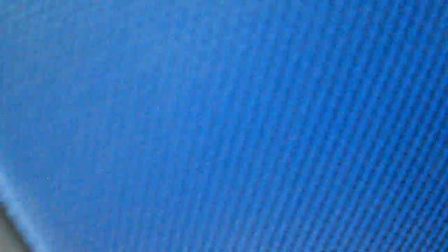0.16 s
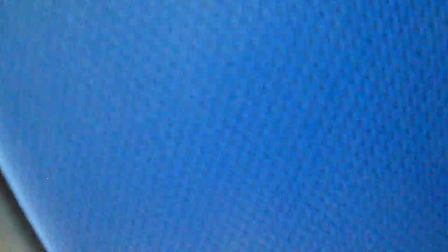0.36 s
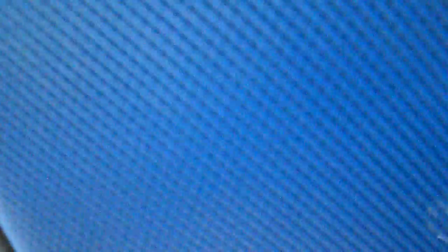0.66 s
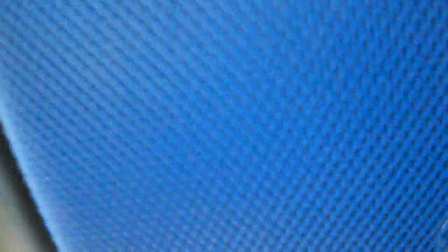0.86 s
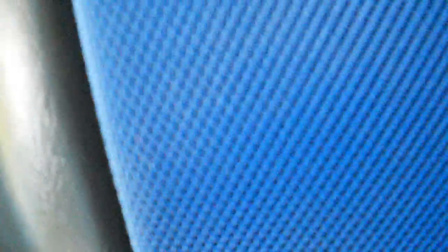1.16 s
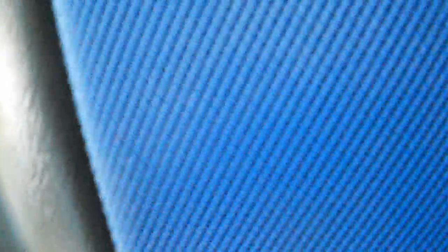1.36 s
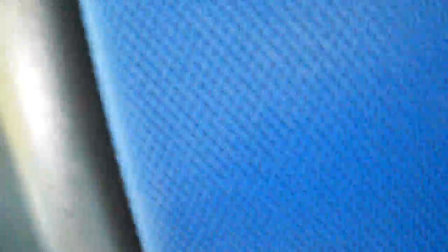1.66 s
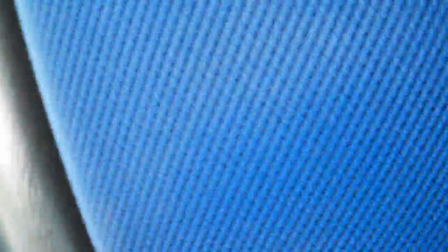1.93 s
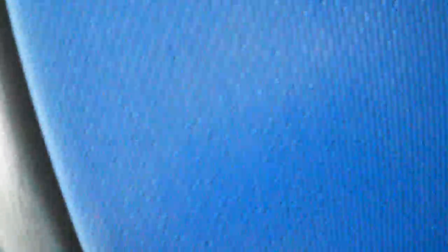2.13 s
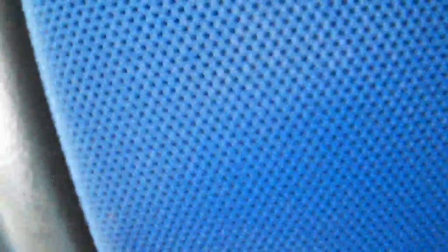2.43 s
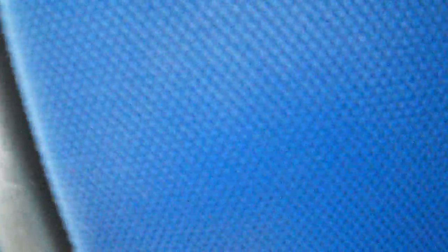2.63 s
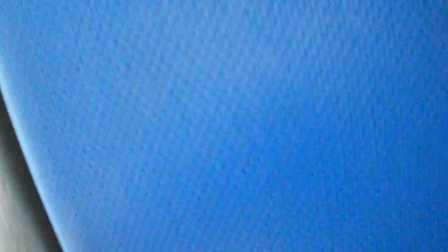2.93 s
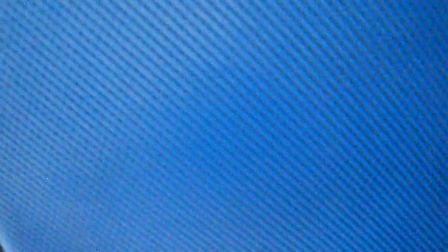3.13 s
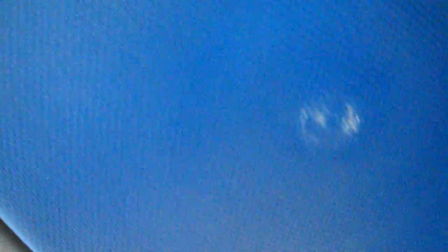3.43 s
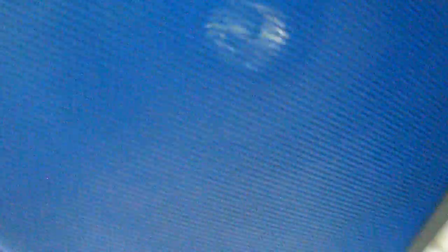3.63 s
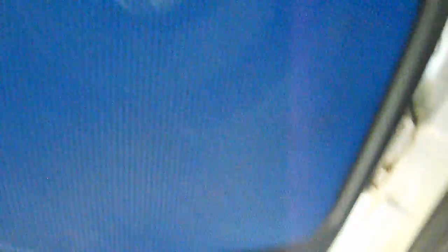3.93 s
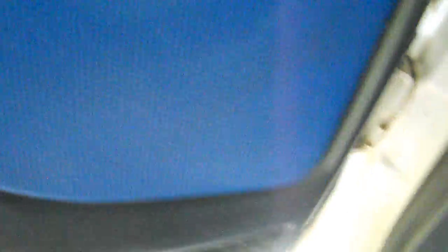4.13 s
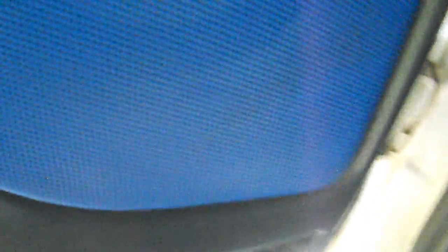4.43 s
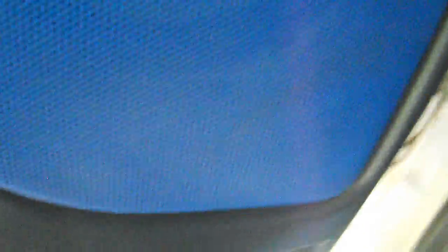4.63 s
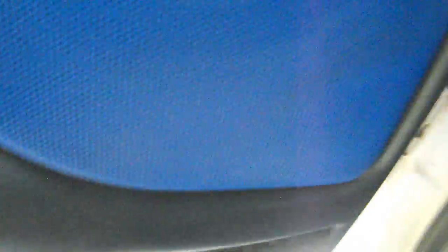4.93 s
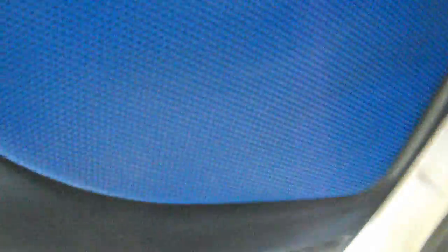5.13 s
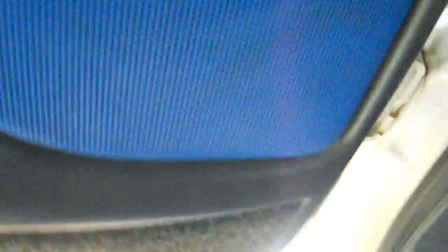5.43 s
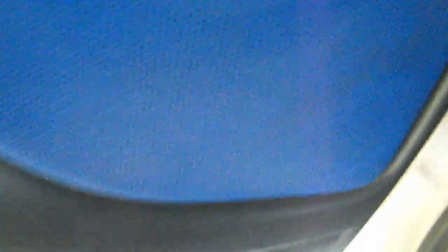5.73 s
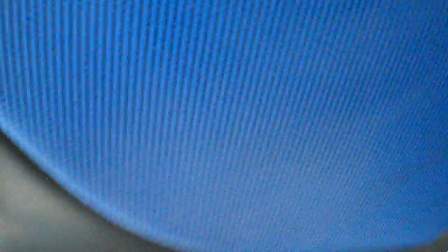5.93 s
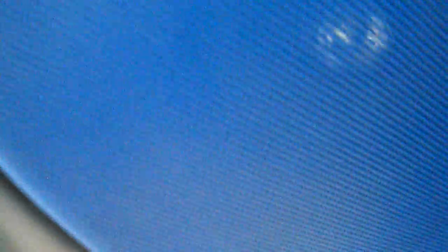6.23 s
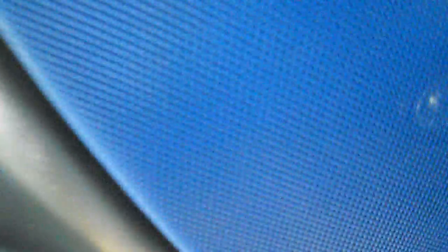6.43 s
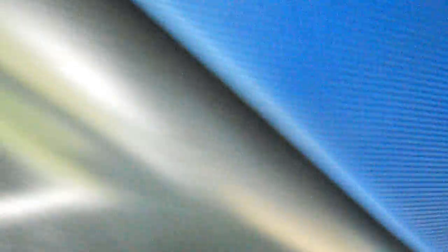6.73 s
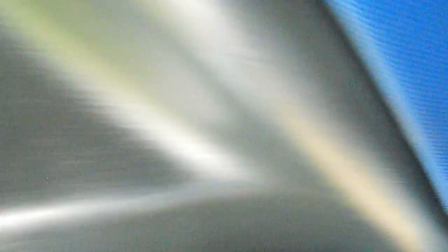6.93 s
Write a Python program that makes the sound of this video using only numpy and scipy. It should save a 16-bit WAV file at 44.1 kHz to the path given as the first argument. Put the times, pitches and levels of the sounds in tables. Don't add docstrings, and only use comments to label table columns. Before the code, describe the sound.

A stiff brush scrubs carpet in short raspy strokes, knocking hard plastic trim and thumping the floor, over a low motor hum and hiss.

```python
import sys
import numpy as np
from scipy import signal
from scipy.io import wavfile
from scipy.ndimage import uniform_filter1d

SR = 44100
rng = np.random.default_rng(int(sys.argv[2]) if len(sys.argv) > 2 else 0)


def volts_from_db(level):
    exponent = np.asarray(level, float) / 20
    return 10 ** exponent


def bounce(signal):
    frames = np.transpose(np.atleast_2d(signal))
    limited = np.clip(frames, -1, 1)
    pcm = np.round(limited * 32767).astype(np.int16)
    wavfile.write(sys.argv[1], SR, pcm)


N = 312228
T = np.arange(N) / SR

# (time [s], gain [dB])
RECORDER_GAIN = [(0.17, -3), (0.72, 1.5), (1.21, -0.6), (2.85, 3), (3.21, -0.2), (4.33, 2), (4.8, -3),
                 (4.95, 0.8), (5.1, -2), (5.25, -17), (5.4, -17), (5.5, -15), (5.78, -17.5), (5.86, -11),
                 (6.24, -6), (6.55, -1.5), (6.92, -1.5), (7.05, -5.5)]


def evened(x):
    return x / np.sqrt(np.mean(x ** 2) + 1e-20)


def add(mix, s, sound):
    part = mix[round(s * SR):][:len(sound)]
    part += sound[:len(part)]


def curve(rows, axis):
    rows = np.array(rows)
    return np.interp(T, rows[:, 0], rows[:, axis])


def colour(x, points, patchy_db, size=512):
    hz, _, z = signal.stft(x, SR, nperseg=size, noverlap=size * 3 // 4)
    f, db = np.transpose(points)
    shape_db = np.interp(np.log(hz + 1), np.log(f + 1), db, left=-70, right=-70)
    patches = uniform_filter1d(rng.standard_normal(z.shape), size=5, axis=0)
    patches = uniform_filter1d(patches, size=12, axis=1)
    z = z * volts_from_db(shape_db[:, None] + patchy_db * evened(patches))
    return evened(signal.istft(z, SR, nperseg=size, noverlap=size * 3 // 4)[1][:N])


def resonate(x, hz, width):
    turn = np.exp(2j * np.pi * np.cumsum(hz) / SR)
    r = np.exp(-np.pi * width / SR)
    return 2 * (turn * signal.lfilter([1 - r], [1, -r], x / turn)).real


def motor():
    # (time [s], shaft speed [Hz], load [dB])
    shaft = [(0, 63.82, -43.5), (1.2, 63.9, -46.5), (1.5, 63.8, -38), (2, 64.03, -41.5), (2.3, 63.7, -46),
             (2.8, 64.1, -44.5), (3.6, 63.76, -38.5), (4.5, 64.14, -38.5), (5.08, 64, -45.5),
             (6.3, 64.6, -47), (7.08, 63.45, -51)]
    # (multiple of the shaft speed, level [dB], drift [dB per s])
    orders = [(1, -5.5, 2), (2, 0, 0), (3, -7, 1.9), (4, -10, 1.5), (5, -22, -2.5), (6, -13.5, 0),
              (7, -43, 1), (8, -18, 0.5)]
    turns = np.cumsum(curve(shaft, axis=1)) / SR
    lines = np.zeros(N)
    for k, db, drift_db in orders:
        waver = evened(uniform_filter1d(rng.standard_normal(N), size=8000))
        level_db = db + drift_db * (T - 3.5) + 1.2 * waver
        lines += volts_from_db(level_db) * np.sin(2 * np.pi * k * turns + 0.379 * k ** 2)
    load_db = curve(shaft, axis=2) + curve(RECORDER_GAIN, axis=1)
    peak_s, rise_db_per_s, fall_db_per_s = 1.8, 60, 28.5
    away_db = np.maximum(rise_db_per_s * (peak_s - T), fall_db_per_s * (T - peak_s))
    hum = volts_from_db(-33 - away_db) * np.sin(2 * np.pi * 84.8 * T)
    return np.sqrt(2) * (volts_from_db(load_db) * lines + hum)


def background():
    # (frequency [Hz], density [dB per Hz])
    air_tone = [(120, -28.5), (200, -13.5), (225, -2.5), (280, -9.5), (385, -11), (597, -15), (742, -14.5),
                (1070, -17.5), (1500, -18), (3730, -22.5), (8500, -25.5), (10600, -28.5), (11200, -64),
                (14500, -76), (22000, -120)]
    # (frequency [Hz], density [dB per Hz])
    rumble_tone = [(4.7, -32), (8.0, 14), (16, -5), (27, -4.5), (86, 1.5), (133, -7), (156, -7.5),
                   (197, -11), (231, -26), (260, -22), (340, -49), (570, -120)]
    hiss = colour(rng.standard_normal(N), air_tone, patchy_db=2.0, size=1024)
    rumble = colour(rng.standard_normal(N), rumble_tone, patchy_db=0.5, size=4096)
    gain_db = curve(RECORDER_GAIN, axis=1)
    return volts_from_db(-40 + gain_db) * hiss + volts_from_db(-37.5 + 1.1 * gain_db) * rumble


def flicks(spread_db):
    size = volts_from_db(spread_db * np.minimum(rng.exponential(1, N), 4)) * rng.standard_normal(N)
    flicks_per_s = 20000
    return evened(size * (rng.random(N) < flicks_per_s / SR))


def grit():
    size = volts_from_db(1.2 * np.minimum(rng.exponential(1, N), 2)) * np.tanh(rng.standard_normal(N))
    jolts_per_s = 1500
    return evened(size * (rng.random(N) < jolts_per_s / SR))


def strokes():
    # (share of the stroke, level lost [dB],
    # tip fizz [dB], block drag [dB], resonance ratio)
    sweeps = [
        (0.0, .123, -28, -3, 590),
        (1.268, 0.23, -32.5, -3, 550),
        (1.751, 0.114, -28, 1.5, 470),
        (2.13, 0.15, -25.5, 0, 416),
        (2.542, 0.098, -25.5, 0.5, 650),
        (3.504, 0.099, -26.5, 0.5, 844),
    ]
    sweep = [(0, 7, -6.5, 6, 0.68), (.28, 1.5, -10, -1, 1.11), (.88, 1.5, -4, 0, 0.85),
             (1, 2, -1.5, 1, 0.58)]
    swells = [
        (0.955, 0.18, -31, 2.7, 520),
        (2.99, 0.11, -23, 3.95, 710.5),
        (4.0, 0.201, -25, 3.8, 1016),
        (4.478, 0.15, -24.5, 3.3, 1070),
        (4.958, 0.15, -29, 4.3, 1078),
    ]
    swell = [(0, 15, -4, 4, 1.4), (0.199, 2.5, -6.5, 3.5, .99), (0.749, 1, -3.5, 0, 1.15),
             (1, 13.5, 0.5, 2, 0.55)]
    flick_strokes = [
        (1.842, 0.06, -26.5, -3, 465),
        (2.647, 0.042, -16.5, 10.5, 444),
        (5.16, 0.082, -46, -6.5, 602),
        (6.128, 0.046, -22, 2, 478),
    ]
    flick = [(0, 5, -4, 2, 1.1), (.2, -1.5, -0.5, 0.5, 0.89), (.6, 2, 0, -7, .99), (1, 17.5, -3, 4, 0.94)]
    scuffs = [
        (0.495, 0.165, -37.5, -10.5, 447),
        (5.11, 0.058, -42.5, -4, 834),
        (6.445, 0.021, -39, 7, 343),
    ]
    scuff = [(0, 2.5, -5.5, 13, .95), (0.201, 0.5, -8, 4.6, 0.55), (.75, 0.5, -8.5, 2.2, 1.93),
             (1, 1.8, -1, 12, 1.1)]
    rubs = [
        (0.417, 0.077, -30.5, -3, 330),
        (3.95, 0.033, -44.5, 0.5, 435),
    ]
    rub = [(0, -1.5, -19, 13, .98), (.2, 0, -29, 11, 0.79), (.75, 2.5, -22, 15, 0.94),
           (1, 6, -14, 11, 0.94)]
    grazes = [
        (0.195, 0.099, -38.5, 3.5, 498),
        (0.853, 0.061, -32, 0.5, 534),
        (3.26, 0.096, -37.5, 5.5, 640),
        (3.68, 0.086, -36, 5, 600),
        (4.22, 0.089, -46, -5, 430),
        (4.39, 0.073, -35, 9, 477.4),
        (6.3, 0.029, -40, 8, 622),
    ]
    graze = [(0, 8.1, -1, 8.5, 0.68), (.3, 2, -9, -7, 1.5), (.8, 4.7, -4.5, 3.5, 1), (1, 7.6, -4, 5, 0.93)]
    wisps = [
        (2.34, .04, -49.5, 0.0023, 477),
        (2.405, 0.081, -49, 0, 530),
    ]
    wisp = [(0, 1, 7, -11, 1.1), (.3, 1, 7.4, -6, .99), (.7, 4, 8, -12, 1.01), (1, 5, 6, -1, 1.01)]
    lunges = [
        (3.112, .037, -17, 1.9, 447),
        (4.656, .029, -13.5, 1, 780),
    ]
    lunge = [(0, 6.5, -0.91, -9, 0.88), (.15, -1.5, -1.3, -2.5, 0.89), (.8, 4, 0, -3.5, .99),
             (1, 4, 0, -4.5, 0.64)]
    digs = [
        (4.638, .018, -19, 3.5, 823),
        (6.559, 0.081, -35, -4.5, 524),
        (6.634, 0.076, -31, -0.5, 658),
    ]
    dig = [(0, -1, -15, 4, 1.02), (.2, 1.5, -5, 6.7, 1.01), (.8, 2, -3, 4, .99), (1, 16, -11.5, 3.7, 0.78)]
    trails = [
        (3.149, 0.016, -40, 0.5, 440),
        (4.685, 0.03, -31, -1.5, 784),
    ]
    trail = [(0, 3, 0, -1, 0.69), (.2, -4.5, 0, -8, 0.69), (.8, 4, 0, -1.5, .99), (1, 8.5, 0, -6.5, 0.95)]
    slides = [
        (6.782, 0.061, -43, 0, 553),
    ]
    slide = [(0, 8.6, -32, 13, 0.93), (.4, 1, -38, 12, 1), (.7, 2, -40, 12, 1.1), (1, 12, -32, 15, 1.4)]
    glides = [
        (5.478, .12, -45, 3, 1096),
    ]
    glide = [(0, 9.5, -1, 4.5, 1.05), (.4, -1.5, 0, 2, 1.2), (.8, -1, -1, -1.5, .85), (1, 3, -6, 1, 0.67)]
    drops = [
        (5.6, 0.08, -34.5, -2, 1000),
    ]
    drop_kind = [(0, 3, -0.5, -4.5, 0.74), (.2, 1.5, -1, -5, 1.06), (.65, 3, 2, -4, .68),
                 (1, 14.5, 1, 3, 0.44)]
    pulls = [
        (0.806, .03, -40, -2.5, 700),
        (6.007, .12, -28.5, 5, 431),
    ]
    pull = [(0, 2.5, -14, 4, .95), (.2, .5, -7, 4.2, 1.6), (.75, .5, -5.5, 2.5, 1.2), (1, 2, -3, 1, 1.1)]
    kinds = ((sweeps, sweep), (swells, swell), (flick_strokes, flick), (scuffs, scuff), (rubs, rub),
             (grazes, graze), (wisps, wisp), (lunges, lunge), (digs, dig), (trails, trail),
             (slides, slide), (glides, glide), (drops, drop_kind), (pulls, pull))
    starts = np.sort([row[0] for events, _ in kinds for row in events] + [N / SR + 1])
    run_on_s = 0.015
    out = []
    for events, kind in kinds:
        share, lost_db, fizz_db, drag_db, ratio = np.transpose(kind)
        for s, length, db, build_db, hz in events:
            room = starts[starts > s][0] - s - 2 / SR
            lifts = np.append(np.ones(len(share) - 1), room > length + run_on_s)
            to_build = np.clip(1 - (share - share[1]) / (share[2] - share[1]), 0, 1)
            level_db = db - lifts * lost_db - build_db * to_build
            press_db = 2.5 * np.log2(hz / 500)
            times = s + (length if lifts[-1] else room) * np.clip(share, 0, 1)
            out.append(np.transpose([times, level_db, fizz_db, drag_db + press_db, hz * ratio]))
    return out


def brush():
    # (frequency [Hz], density [dB per Hz])
    bristle_tone = [(880, -46), (1500, 12), (1590, -22), (1880, -3.5), (2520, 4), (2860, -5.5), (3870, -2),
                    (5230, -4), (5790, -3.5), (7380, -5.5), (9730, -10), (10700, -18), (11100, -78.5),
                    (14500, -66), (22000, -120)]
    # (frequency [Hz], density [dB per Hz])
    drag_tone = [(71, 11.5), (120, -11), (216, 4), (443, 5.5), (598, -4.5), (771, 0), (950, -3.5),
                 (1390, -2), (1900, -6.5), (2470, -45.5), (4180, -120)]
    played = strokes()
    rows = np.concatenate(played)
    rows = rows[np.argsort(rows[:, 0])]
    level_db, fizz_db, drag_db, well_hz = [curve(rows, axis) for axis in (1, 2, 3, 4)]

    contact = np.zeros(N)
    for stroke in played:
        contact[max(round(stroke[0][0] * SR), 0):round(stroke[-1][0] * SR)] = 1
    contact = uniform_filter1d(contact, size=480) ** 0.85
    clicks = flicks(spread_db=-0.6)
    grip = evened(uniform_filter1d(rng.standard_normal(N), size=400))
    level = contact * volts_from_db(uniform_filter1d(level_db, size=240) + 0.18 * grip)

    low_tone = [p for p in bristle_tone if p[0] < 3900]
    high_tone = [p for p in bristle_tone if 2800 < p[0] < 5400]
    fizz_tone = [p for p in bristle_tone if p[0] > 5000]
    low = colour(clicks, low_tone, patchy_db=2.5, size=256)
    high = colour(flicks(spread_db=-1.5), high_tone, patchy_db=2.5, size=256)
    tips = volts_from_db(0.5 * fizz_db + 3.5)
    rasp = (low + tips * high) / np.sqrt(1 + tips ** 2)
    fizz = colour(clicks, fizz_tone, patchy_db=2.0, size=256)

    weight = np.clip(drag_db / 14, 0, 1)
    jolts = (1 - weight) * flicks(spread_db=-1.5) + weight * grit()
    deep = colour(jolts, [p for p in drag_tone if p[0] < 700], patchy_db=-1.5)
    drag = evened(colour(jolts, drag_tone, patchy_db=3.5) + 0.8 * weight * deep)

    wander = 1 + 0.073 * evened(uniform_filter1d(grip, size=900))
    well = evened(resonate(clicks, wander * well_hz, width=134))
    gap = evened(resonate(clicks, 1.34 / wander * well_hz, width=246))
    well_db = -5.5 + 5 * np.log2(well_hz / 500)
    block = evened(drag + volts_from_db(well_db) * well + volts_from_db(-6) * gap)
    return level * (rasp + volts_from_db(fizz_db) * fizz + volts_from_db(drag_db) * block)


def tufts():
    # (start [s], length [s], level [dB], centre [Hz])
    springs = [(1.76, 0.083, -32, 2300), (2.135, 0.15, -35, 2300), (2.187, 0.07, -36, 3800),
               (2.55, .08, -36, 4000), (2.56, 0.079, -36, 1500), (6.129, .035, -31, 2800),
               (6.128, 0.042, -32, 4300), (6.795, .04, -39, 2200), (0.414, 0.016, -24.5, 2700),
               (0.441, .012, -25, 2750), (0.095, 0.034, -35, 5500), (0.858, .02, -39, 2100),
               (5.604, .05, -44, 2400), (6.574, .04, -38, 2350)]
    out, clicks = np.zeros(N), flicks(spread_db=-1.5)
    for s, length, db, hz in springs:
        part = clicks[round(s * SR):round((s + length) * SR)]
        centre_hz = np.full(len(part), hz)
        ring = resonate(resonate(part, centre_hz, width=420), centre_hz, width=420)
        add(out, s, volts_from_db(db) * np.sqrt(np.hanning(len(part))) * evened(ring))
    return out


def ticks():
    # (time [s], peak [dB], centre [Hz])
    plastic = [(.239, -25, 3300), (.406, -25, 2150), (1.765, -15, 2300), (1.785, -23, 2250),
               (0.4155, -20, 3500), (0.424, -10.5, 2680), (0.4425, -19, 4500), (.458, -22, 5200),
               (.467, -23, 2100), (0.479, -14.5, 2600), (0.495, -6, 5900), (0.5, -9.5, 4260),
               (.522, -20.5, 5000), (.672, -33, 5500), (.805, -34, 3770), (1.1617, -25.5, 2500),
               (3.3398, -17.5, 2080), (3.7556, -26, 2300), (3.9457, -29, 2182), (4.39, -28, 2970),
               (4.79, -44, 2370), (4.8841, -24, 2900), (5.0966, -5, 6400), (5.1021, -7.5, 2160),
               (6.0041, -26, 2000), (6.456, -23, 4730), (6.557, -30, 2320), (6.564, -26, 2300),
               (6.571, -9, 3620), (6.578, -21, 2420), (6.59, -33, 2300), (6.6, -28, 1900),
               (6.634, -29, 2250), (6.635, -16.5, 3700), (6.658, -25, 3020), (6.668, -29, 3620),
               (6.712, -24, 3900), (6.74, -26.5, 4300), (6.781, -38, 2370), (6.794, -40, 2300),
               (6.8015, -36.5, 2270), (6.811, -38, 2180), (6.8186, -40.5, 2240), (6.828, -59, 2320)]
    out, t = np.zeros(N), T[:3000]
    wide = signal.butter(2, [1800, 8500], "band", fs=SR)
    fade_db = -60 * t / 0.022
    for s, db, hz in plastic:
        noise = rng.standard_normal(len(t))
        centre_hz = np.full(len(t), hz)
        narrow = resonate(resonate(noise, centre_hz, width=550), centre_hz, width=550)
        centre = evened(signal.lfilter(*wide, narrow))
        snap = volts_from_db(-4.5 + fade_db) * evened(signal.lfilter(*wide, noise))
        add(out, s, 0.5 * volts_from_db(db + fade_db) * (centre + snap) * np.minimum(t / 0.00025, 1))
    return out


def knocks():
    # (time [s], peak [dB], ring [Hz], hardness [dB per octave])
    blows = [(0.418, -14, 450, 1), (0.437, -4.5, 436, 7), (0.454, -5, 428, 4.5), (0.711, -34, 510, 12),
             (2.128, -12, 500, -1.5), (2.543, -34, 600, 10), (2.656, -15, 407, 11.5), (2.673, -9, 402, 5),
             (3.123, -7, 454, 4.5), (3.137, -8.5, 442, 3), (3.339, -9.5, 694, 7.5), (3.414, -25.5, 430, -8),
             (3.758, -15, 1074, 1), (3.923, -22, 1460, 1), (3.943, -29.5, 408, 18), (4.389, -16.5, 640, 3),
             (4.499, -8.5, 1074, 0.5), (4.789, -29.5, 620, 11.5), (4.884, -20.5, 900, -3.5),
             (5.0956, 12.5, 1080, 1.5), (5.41, -35.5, 1120, -2), (6.0055, -15, 814, 5.5),
             (6.09, -14, 445, 9.5), (6.458, -19.5, 587, -4), (6.531, -30, 413, 3), (6.563, -12, 500, 5),
             (6.57, -5, 605, 7.5), (6.583, -15, 695, 8), (6.601, -11.5, 800, -6), (6.619, -19.5, 700, -4),
             (6.635, -9, 622, -6), (6.669, -14, 759, -10), (6.71, -14.5, 640, -3), (6.739, -15, 624, -6),
             (6.782, -20.5, 478, -6)]
    # (ratio to the ring, level [dB])
    modes = [(0.329, -3), (.5, -9), (.65, -1.5), (1.001, 4), (1.22, -6), (1.5, -7), (1.849, -5),
             (2.15, -10.5), (2.5, -12.5), (3.001, -17.5), (3.7, -18.5)]
    out, t = np.zeros(N), T[:6000]
    for s, db, hz, hard_db in blows:
        t60 = 0.049 * (500 / hz) ** 0.78
        ring = np.zeros(len(t))
        for k, mode_db in modes:
            chance = rng.random()
            mode_hz = hz * k * (0.987 + 0.088 * chance)
            fade = volts_from_db(mode_db + hard_db * np.log2(k) - 60 * t * k ** 0.32 / t60)
            ring += fade * np.cos(2 * np.pi * (mode_hz * t - 0.74 * chance))
        body = signal.butter(2, [0.13 * hz, 5.5 * hz], "band", fs=SR)
        crack = evened(signal.lfilter(*body, rng.standard_normal(len(t))))
        ring += volts_from_db(2 - 60 * t / (0.37 * t60)) * crack
        add(out, s + 0.000975, 0.27 * volts_from_db(db) * ring * np.minimum(t / 0.00081, 1))
    return out


def cabin(x):
    at = np.arange(60, 5000, 22)
    at = at + rng.integers(0, 22, len(at))
    taps = np.zeros(5100)
    taps[at] = rng.choice([-1., 1.], len(at)) * volts_from_db(-60 * at / SR / 0.081)
    soft = signal.lfilter(*signal.butter(1, 2000, fs=SR), taps / np.linalg.norm(taps))
    return signal.oaconvolve(x, soft)[:N]


def thumps():
    # (time [s], peak [dB], pan [Hz], t60 [s])
    pan_thumps = [(0.419, -6, 217, 0.14), (0.438, -1.5, 223, 0.18), (0.468, -7, 261, 0.16),
                  (0.513, -11.5, 280, 0.22), (0.802, 11, 95.2, 0.082), (0.839, 0.5, 112, 0.073),
                  (0.894, -14, 62.3, 0.11), (1.283, -12, 86.5, 0.13), (2.132, -7, 80.4, 0.088),
                  (3.944, -11, 150, 0.12), (4.049, -9, 72.6, 0.11), (4.501, -0.5, 113, 0.068),
                  (4.899, -7, 89, 0.1), (5.053, -17, 77.1, 0.14), (5.108, 2.5, 294, 0.032),
                  (5.404, -21, 107, 0.075), (5.485, -32, 77, 0.34), (6.018, 1, 98, 0.11),
                  (6.455, -2, 245, 0.045), (6.477, -15, 254, 0.19), (6.548, -0.5, 196, 0.035),
                  (3.965, -11, 113, 0.13), (4.007, -14, 105, 0.18), (6.56, 2.5, 96, 0.15),
                  (6.568, 4, 302, 0.049), (3.115, -10.5, 374, 0.15),
                  (0.424, -17.5, 90, 0.22),
        (0.489, -11, 75, 0.13),
        (4.64, -6, 119.3, 0.14),
        (6.133, -7.5, 88.4, 0.065),
        (6.029, -14, 204.4, 0.13),
        (6.449, -37, 63.8, 0.1),
    ]
    # (time [s], peak [dB], ring [Hz], t60 [s])
    bumps = [(2.655, -5.5, 424, 0.11), (2.671, -3, 430, 0.11), (2.679, -9, 450, 0.091),
             (3.113, -11, 430, .1), (3.127, -8, 445, .1), (3.139, -5.5, 452, .1), (4.642, -13, 720, .1),
             (4.649, -11, 1200, .1), (4.658, -7, 700, 0.13), (4.664, -7, 850, .1), (4.669, -5, 730, 0.12),
             (4.676, -11.5, 890, .12), (6.093, -10, 1195, .08), (6.156, -12.5, 410, 0.1),
             (6.713, -19, 770, 0.16), (5.099, -5.5, 580, 0.11), (3.056, -10, 750, 0.14),
             (3.072, -11, 810, .12), (3.982, -28, 1290, 0.13), (6.741, -22, 625, 0.12),
             (6.638, -13, 780, 0.15), (5.572, -28, 440, 0.11), (5.658, -29.5, 400, .15),
             (6.762, -21.5, 260, .15), (6.012, -14, 400, 0.084), (6.104, -17, 420, .12),
             (5.066, -16, 180, .1), (5.076, -22, 440, 0.074), (5.608, -22, 1150, .2),
             (5.524, -28, 1200, .2), (.53, -14, 230, 0.26), (5.099, -4.5, 680, .13),
             (3.341, -17.5, 350, 0.096), (4.39, -21, 520, 0.1), (6.462, -14, 300, .08)]
    out, t = np.zeros(N), T[:9000]
    for s, db, hz, t60 in pan_thumps + bumps:
        swell = 1 - np.exp(-(t * hz / 0.78) ** 2)
        fade = volts_from_db(db - 60 * t * (hz / 100) ** 0.5 / t60)
        add(out, s, 0.59 * fade * swell * np.sin(2 * np.pi * hz * t))
    return out


def squeak():
    length_s, start_hz, rise_hz = 0.06, 400, 200
    u = np.arange(0, length_s, 1 / SR) / length_s
    wobble = evened(uniform_filter1d(rng.standard_normal(len(u)), size=200))
    turns = np.cumsum(start_hz + rise_hz * u + 50 * wobble) / SR
    level = volts_from_db(-26.5 + 3.5 * np.roll(wobble, 300)) * np.sin(np.pi * u)
    out = np.zeros(N)
    add(out, 6.785, level * np.sin(2 * np.pi * turns))
    return out


def scene():
    hits = knocks() + ticks()
    near = brush() + hits + thumps() + volts_from_db(-10.5) * cabin(hits)
    return (near + motor() + background() + squeak() + tufts())[None]


def top_cut(x):
    return signal.sosfilt(signal.butter(12, 11280, fs=SR, output="sos"), x)


def record(dry):
    over = np.maximum(abs(dry) - 0.6, 0)
    softened = dry - 0.5 * np.sign(dry) * over
    low_pass = signal.firwin(95, 11250, window=("kaiser", 8), fs=SR)
    band = signal.oaconvolve(softened, low_pass[None], "same")
    return top_cut(band)


dry = scene()
out = record(dry)
bounce(out)
```